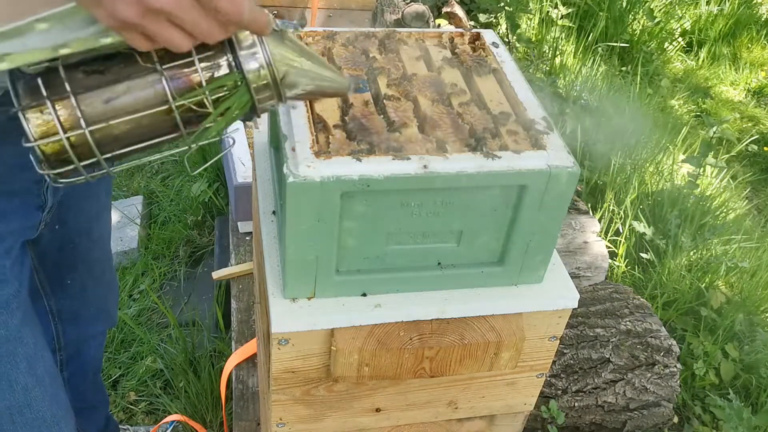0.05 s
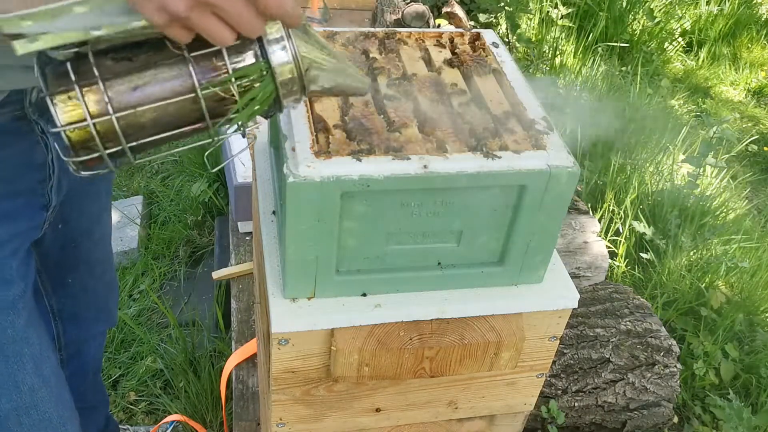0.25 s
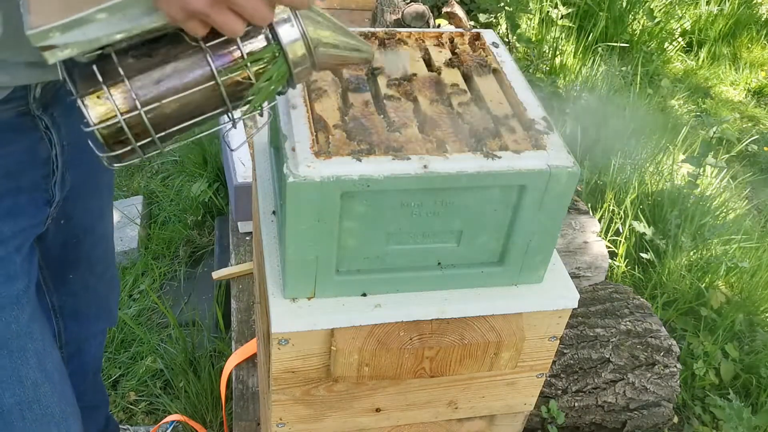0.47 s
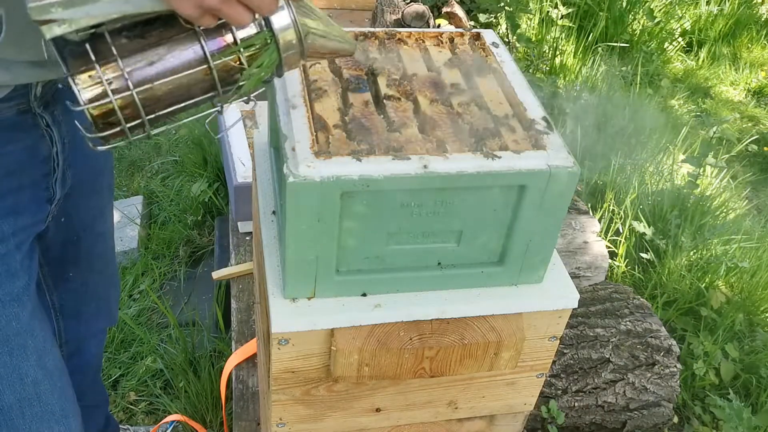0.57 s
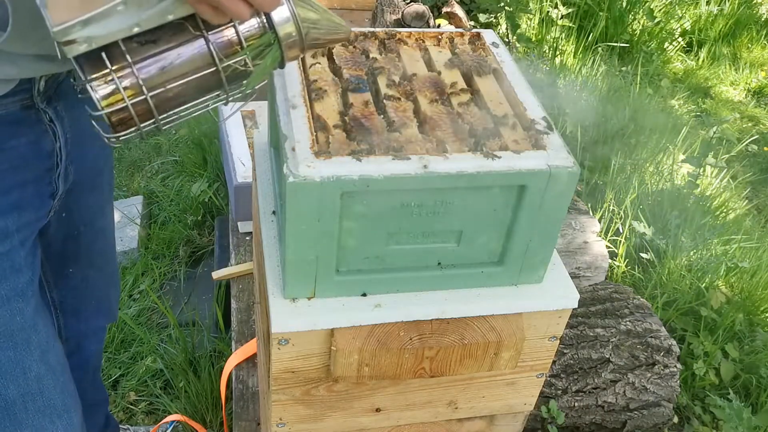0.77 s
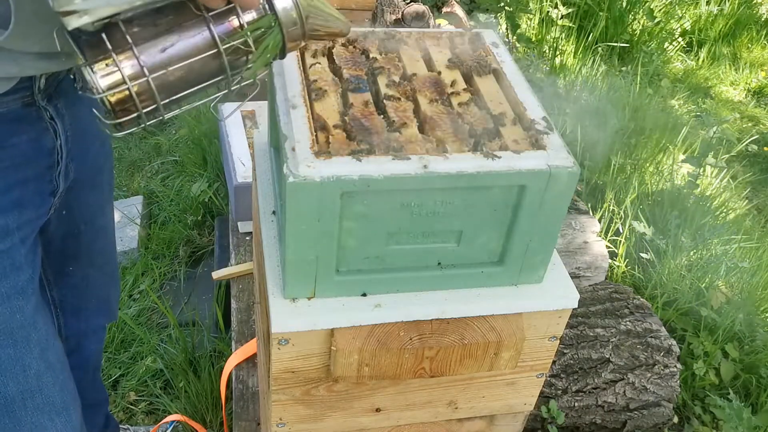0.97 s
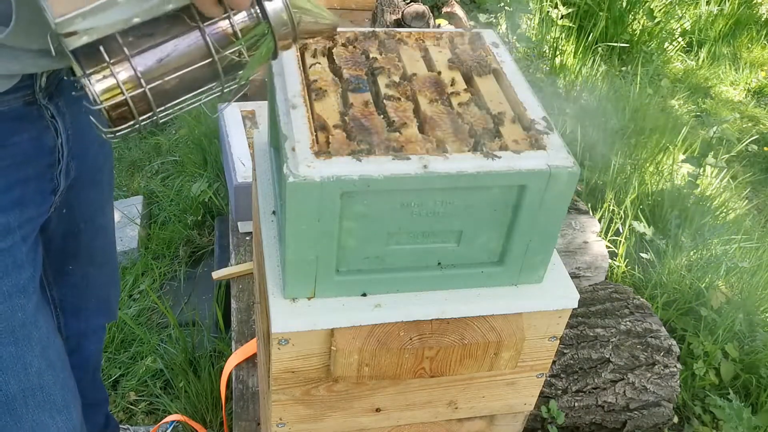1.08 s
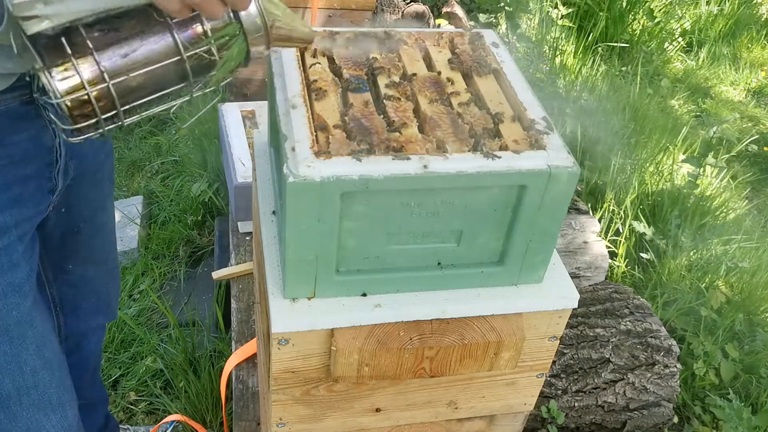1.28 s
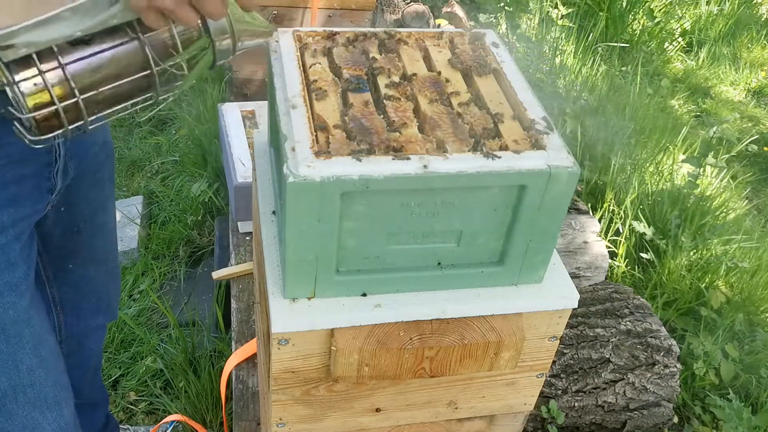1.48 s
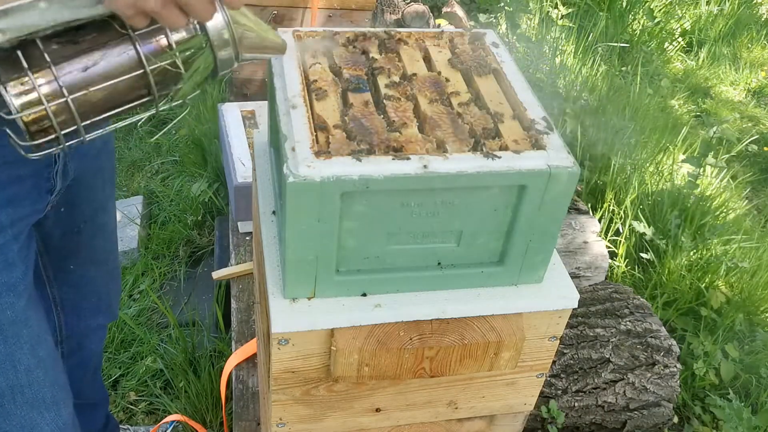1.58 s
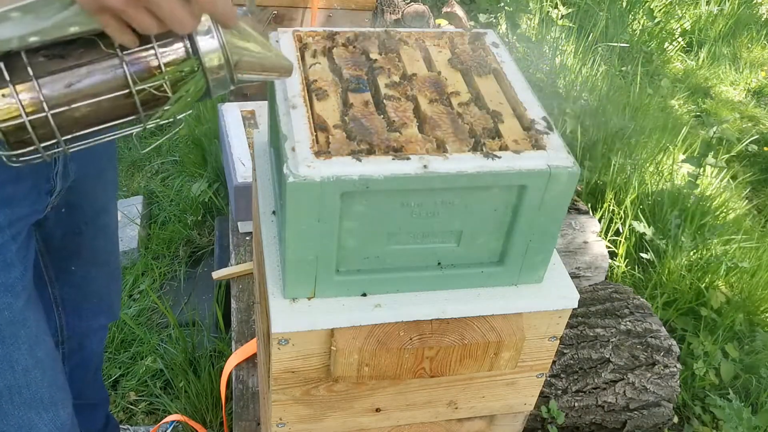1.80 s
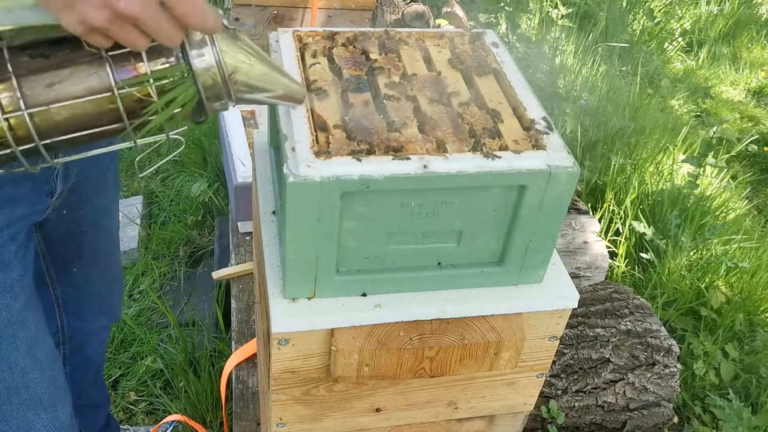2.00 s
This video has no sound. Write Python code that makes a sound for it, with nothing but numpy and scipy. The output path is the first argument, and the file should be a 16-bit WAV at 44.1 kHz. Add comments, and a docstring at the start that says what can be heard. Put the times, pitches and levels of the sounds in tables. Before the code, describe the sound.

A bee smoker is pumped five times, close on the left, at about 0.2, 0.6, 1.0, 1.4 and 1.7 seconds. Each squeeze gives a soft valve slap and a hollow, hissing puff like a blown bottle, the later ones weaker. Between squeezes the bellows suck air in with light knocks, ticks and tiny squeaks. A bird chirps faintly twice in the first half second over quiet garden air.

```python
"""A bee smoker is pumped five times beside an open hive, close by and to the left.
Each squeeze slaps the bellows valve shut and drives a puff through the hollow can, which sounds
like a blown bottle. The bellows then spring open, sucking air, with ticks and tiny squeaks.
A bird chirps twice over a quiet garden."""
import sys
import numpy as np
from scipy import signal
from scipy.fft import rfft, irfft
from scipy.io import wavfile

SR = 44100
rng = np.random.default_rng(int(sys.argv[2]) if len(sys.argv) > 2 else 0)


def unload_wav(signal):
    """Save mono or channel-first audio to the path in sys.argv[1] as 16-bit WAV at rate SR, clipped to [-1, 1]."""
    wavfile.write(
        sys.argv[1],
        SR,
        np.round(np.clip(np.atleast_2d(signal).T, -1, 1) * 32767).astype(np.int16),
    )


N = 90404

# Levels in all tables are relative: each function adds its own overall level. One row per squeeze: (valve shuts
# [s], slap [dB], lift of the slap's two middle tones [dB], metal clink [dB], bounce delay [s], bounce [dB], can
# drone [dB], rush [dB], hiss [dB], puff length [s])
PUMP_STROKES = [(0.2417, 1.5, 10.5, -5.5, .0073, -12, 0, -3, -1, 0.12),
                (0.6368, 1.5, 1.5, -12, 0.0052, -9, -1.5, -3, 0.5, 0.099),
                (1.0254, 1.5, -7.5, -5, 0.00486, -20, -2.5, -5.5, -3.5, 0.1),
                (1.3880, 0.5, -28, -1.5, 0.0052, -11, -3.5, -7.5, -7, 0.099),
                (1.7433, 0, 1, 0, 0.0047, -11, -4.5, -10, -7.5, 0.076)]
# Hiss of escaping air: (frequency [Hz], level [dB])
HISS_SPECTRUM = [(2500, -12), (4200, 10), (5200, 4), (6600, 6), (12000, 3), (13200, -10)]
# Rustle of the leather: (frequency [Hz], level [dB])
LEATHER_SPECTRUM = [(50, -7.5), (200, 7.5), (850, -5.5), (1500, -16), (4000, -47)]


def undb(db):
    """Turn decibels into a gain."""
    return 10 ** (np.asarray(db) / 20)


def unit(x):
    """Scale to an average (rms) strength of 1."""
    return x / np.sqrt(np.mean(x ** 2) + 1e-20)


def clock():
    """The time of every sample, in seconds."""
    return np.arange(N) / SR


def colour(x, points):
    """Filter by a curve of (frequency [Hz], level [dB]) points."""
    hz, db = np.array(points, float).T
    freqs = np.arange(N // 2 + 1) * SR / N
    gain = undb(np.interp(np.log(freqs + 1), np.log(hz), db))
    return irfft(rfft(x) * gain, N)


def cut(x, order, hz, keep):
    """Keep the "low" or the "high" side of a frequency."""
    return signal.sosfilt(signal.butter(order, hz, keep, fs=SR, output="sos"), x)


def noise(points):
    """Steady noise with the given spectrum."""
    return unit(colour(rng.standard_normal(N), points))


def burst(points, envelope):
    """A short rustle or knock with the given spectrum."""
    white = rng.standard_normal(N)
    return colour(white * envelope, points) / np.std(colour(white, points))


def sine(hz):
    """A tone of strength 1 that follows a moving pitch."""
    return np.sqrt(2) * np.sin(2 * np.pi * np.cumsum(hz) / SR)


def blown(hz, width_hz):
    """A resonance stirred by swirling air: its pitch wanders, its strength stays fairly even."""
    freqs = np.fft.fftfreq(N, 1 / SR)
    band = np.fft.ifft(np.fft.fft(rng.standard_normal(N)) / (1 + ((freqs - hz) / width_hz) ** 2))
    return unit(np.sqrt(np.abs(band)) * np.cos(np.angle(band)))


def swell(middle, width_s):
    """A bell-shaped rise and fall."""
    return np.exp(-.5 * ((clock() - middle) / width_s) ** 2)


def rise(start, rise_s):
    """A smooth build-up from nothing."""
    return 1 - np.exp(-np.maximum(clock() - start, 0) / rise_s)


def fade(start, fade_s):
    """A sudden start that dies away by 60 dB in the fade time."""
    age = clock() - start
    return (age >= 0) * np.exp(-np.log(1000) * np.maximum(age, 0) / fade_s)


def ring(start, modes, pitch=1):
    """The natural tones (modes) of a struck object, dying away."""
    age = np.maximum(clock() - start, 0)
    return sum(undb(db) * fade(start, fade_s) * np.sin(2 * np.pi * hz * pitch * age)
               for hz, db, fade_s in modes)


def echo(x, fade_s):
    """Scattered outdoor reflections, different on each side."""
    tail = rng.standard_normal((2, N)) * fade(0, fade_s)
    return signal.fftconvolve(x[None], tail / np.sqrt(np.sum(tail[0] ** 2)), axes=1)[:, :N]


def garden():
    """Soft outdoor air, a low hum that swells once, and a faint hiss on the left."""
    # Outdoor air: (frequency [Hz], level [dB])
    air_spectrum = [(25, -9), (160, -1), (300, -6), (900, -10), (2800, -22.5), (5500, -41), (15500, -35.5)]
    # Faint hiss: (frequency [Hz], level [dB])
    faint_spectrum = [(1500, -10), (4500, -1.5), (15500, -25.5)]
    split_hz, hum_hz = 990, 55.6
    bass = cut(noise(air_spectrum), 1, split_hz, "low")  # the same on both sides
    treble = cut([noise(air_spectrum), noise(air_spectrum)], 1, split_hz, "high")
    hum = (undb(-69) + undb(-52.5) * swell(1.41, width_s=0.069)) * sine(np.full(N, hum_hz))
    left_hiss = undb(-78) * noise(faint_spectrum) * np.array([[1], [0]])
    return undb(-59.5) * (bass + treble) + hum + left_hiss


def bird():
    """A bird on the left gives thin falling whistles that echo from the trees."""
    # Chirps: (middle [s], level [dB])
    chirps = [(0.149, -61), (0.407, -62.5)]
    middle_hz, octaves_per_s, right_db = 4400, -11, -15
    out = 0
    for t, db in chirps:
        hz = middle_hz * 2 ** np.clip(octaves_per_s * (clock() - t), -1, 1)
        out += undb(db) * swell(t, width_s=.012) * np.sin(2 * np.pi * np.cumsum(hz) / SR)
    return (out + undb(2) * echo(out, fade_s=0.6)) * undb([[0], [right_db]])


def metal_clicks():
    """The smoker's metal parts give small crisp clicks."""
    # Clicks: (time [s], level [dB])
    clicks = [(1.528, -58.5), (1.7377, -55.5)]
    # Sound of a click: (frequency [Hz], level [dB])
    click_spectrum = [(2500, -12), (5500, -4), (15500, -17)]
    return burst(click_spectrum, sum(undb(db) * fade(t, fade_s=0.021) for t, db in clicks))


def whistles_and_creak():
    """Air whistles softly over the edges of the nozzle and the intake; near the end a faint drawn-out squeal
    sinks in pitch."""
    # Whistles, and the last sinking squeal: (middle [s], pitch [Hz], glide [Hz/s], level [dB])
    whistles = [(.055, 8450, 3000, -66), (.296, 1200, 4500, -46), (.286, 5000, 0, -61),
                (.685, 2450, 2000, -55), (.683, 5950, 0, -62), (.683, 9100, 0, -61), (1.07, 9350, 0, -66),
                (1.578, 8050, 0, -66), (1.912, 8750, 0, -66), (1.975, 2180, -2500, -59)]
    out = 0
    for t, hz, glide, db in whistles:
        pitch = hz + glide * (clock() - t)
        spread_hz = 0.054 * hz
        waver = noise([(spread_hz, 0), (4 * spread_hz, -40)])  # makes the tone breathy
        out += undb(db) * swell(t, width_s=0.016) * waver * sine(pitch)
    return out


def air_intake():
    """The bellows suck air back in while the leather unfolds."""
    # Refills: (middle [s], half length [s], hiss [dB], rustle [dB])
    refills = [(0.051, 0.056, 5.5, -6), (.455, 0.05, 9.5, 17), (0.832, 0.056, 6.5, -1),
               (1.219, 0.042, 9, 2), (1.568, 0.051, 7, 13.5), (1.923, 0.048, 7, 5)]
    # Air rushing in: (frequency [Hz], level [dB])
    suck_spectrum = [(700, 14.5), (1600, 9.5), (2800, 5.5), (6000, -12.5), (8400, -2.5), (10800, -5),
                     (13000, -14)]
    suck = undb(-61) * noise(suck_spectrum)
    leather = undb(-68.5) * noise(LEATHER_SPECTRUM)
    return sum(swell(t, width_s) * (undb(hiss_db) * suck + undb(rustle_db) * leather)
               for t, width_s, hiss_db, rustle_db in refills)


def opening_knocks():
    """As the bellows open, the boards knock and rattle and the hinge ticks."""
    # Openings: (time [s], knock [dB], tick [dB])
    openings = [(0.0368, -0.5, -4.5), (0.4539, 6.5, -1), (0.835, 7.5, 10), (1.217, -10, -12),
                (1.5770, -3.5, -22), (1.9149, 4.5, 3)]
    # Ringing wood: (pitch [Hz], level [dB], fade time [s])
    wood_modes = [(524, -2, 0.079), (820, 5.5, 0.017)]
    # Ringing hinge: (pitch [Hz], level [dB], fade time [s])
    hinge_modes = [(1095, 4.5, 0.0065), (1930, -3, 0.0087), (3580, -1, 0.0047)]
    rattle_level = sum(undb(db - 53) * fade(t, fade_s=0.063) for t, db, _ in openings)
    out = burst(LEATHER_SPECTRUM, rattle_level)
    for t, knock_db, tick_db in openings:
        knock = undb(knock_db - 43.5) * ring(t, wood_modes)
        tick = undb(tick_db - 36.5) * ring(t, hinge_modes)
        out += rise(t, rise_s=0.00061) * (knock + tick)
    return out


def spring_squeaks():
    """The spring squeaks with two close, high tones and a rasp."""
    # Squeaks: (time [s], level [dB], pitch [ratio])
    squeaks = [(.4665, -5.5, 0.979), (.856, -4.5, 0.98), (1.235, -5, 0.98), (1.242, -5.5, 0.99),
               (1.575, -16.5, .81), (1.934, -19, 0.95)]
    # Ringing spring: (pitch [Hz], level [dB], fade time [s])
    spring_modes = [(4334, 2, 0.024), (4212, -1.5, 0.022)]
    rasp = undb(-12.5) * blown(hz=2780, width_hz=460)
    out = 0
    for t, db, pitch in squeaks:
        squeak = ring(t, spring_modes, pitch) + rasp * fade(t, fade_s=0.057)
        out += undb(db - 28.5) * rise(t, rise_s=0.0022) * squeak
    return out


def leather_folds():
    """Just before each slap the leather folds and a little air leaks out."""
    # Folds: (time [s], level [dB])
    folds = [(0.217, 2), (0.602, 0), (1.005, 2.5), (1.357, -1.5), (1.707, -5.5)]
    # Folding leather: (frequency [Hz], level [dB])
    fold_spectrum = [(50, -67), (130, 4.5), (230, 13), (400, -3), (700, 1.5), (3000, -41.5)]
    fold_s = 0.021
    fold_level = sum(undb(db - 38.5) * rise(t, rise_s=0.0027) * swell(t + fold_s, fold_s)
                     for t, db in folds)
    leak_level = undb(-72) * sum(swell(t + .018, width_s=.022) for t, _ in folds)
    return burst(fold_spectrum, fold_level) + leak_level * noise(HISS_SPECTRUM)


def can_tones():
    """Air sounds the can like a bottle; each tone swells, climbs and breaks off."""
    # Hollow tones: (loudest at [s], pitch then [Hz], level [dB])
    tones = [(.317, 236, -40.5), (.714, 213.3, -31.5), (1.117, 206.8, -40.5), (1.462, 208.7, -42.5)]
    # Slow wobble of the air stream: (frequency [Hz], level [dB])
    wobble = [(30, -3), (200, -66)]
    climb_hz_per_s, wander_hz, swell_s, stop_s = 550, 8.14, 0.019, 0.0073
    out = 0
    for t, hz, db in tones:
        pitch = hz + climb_hz_per_s * (clock() - t) + wander_hz * noise(wobble)
        width_s = np.where(clock() < t, swell_s, stop_s)
        level = undb(db + noise(wobble))  # flutters by about 1 dB
        out += level * swell(t, width_s) * sine(pitch)
    return out


def puffs():
    """Air drones in the hollow can, then rushes and hisses out of the nozzle."""
    # Resonances of the can and bellows: (pitch [Hz], width [Hz], level [dB])
    hollows = [(194, 29.3, 5.5), (303, 112, 0.5), (573, 9.1, -9)]
    # Air leaving the nozzle: (frequency [Hz], level [dB])
    rush_spectrum = [(100, -34), (300, 6.5), (480, -5), (633, -11), (1200, -4.5), (1550, -13.5),
                     (2700, -16.5), (5000, -45)]
    drone = undb(-38.5) * unit(sum(undb(db) * blown(hz, width) for hz, width, db in hollows))
    rush = undb(-33) * noise(rush_spectrum)
    hiss = undb(-56) * noise(HISS_SPECTRUM)
    out = 0
    for t, *_, drone_db, rush_db, hiss_db, length in PUMP_STROKES:
        air = undb(drone_db) * drone * swell(t + 0.37 * length, 0.47 * length)
        air += undb(rush_db) * rush * swell(t + 0.4 * length, 0.29 * length)
        out += rise(t, rise_s=0.012) * air  # the jet builds once the valve has shut
        out += undb(hiss_db) * hiss * swell(t + 0.49 * length, 0.24 * length)
    return out


def flap_hit(start, woody_db):
    """The soft valve flap hits the board; an off-centre hit brings out two of its middle tones."""
    # Ringing valve and boards: (pitch [Hz], level [dB], fade time [s])
    board_modes = [(210, -11, 0.011), (330, 6.5, 0.016), (510.5, -9.5, 0.027), (733, -11.5, 0.019),
                   (1023, -13.5, 0.02)]
    modes = [(hz, db + woody_db * is_woody, fade_s)
             for (hz, db, fade_s), is_woody in zip(board_modes, (0, 0, 1, 1, 0))]
    hit = -rise(start, rise_s=0.002) * ring(start, modes)
    return cut(hit, order=2, hz=130, keep="high")


def valve_slaps():
    """Each squeeze slaps the valve shut; it bounces once, and the jolt makes the can clink."""
    # Ringing metal can: (pitch [Hz], level [dB], fade time [s])
    metal_modes = [(2393, -0.5, 0.019), (2529, -12, 0.056), (3800, 0, 0.0027)]
    out = 0
    for t, slap_db, woody_db, clink_db, bounce_s, bounce_db, *_ in PUMP_STROKES:
        bounce = undb(bounce_db) * flap_hit(t + bounce_s, woody_db)
        out += undb(slap_db - 13.5) * (flap_hit(t, woody_db) + bounce)
        out += undb(clink_db - 34) * rise(t, rise_s=0.00072) * ring(t, metal_modes)
    return out


def scene():
    """The smoker in the garden; its sound reaches the right side later and duller than the left."""
    # Weakening on the right: (frequency [Hz], level [dB])
    shadow = [(200, -1.9), (1100, -5.5), (2400, -14.5), (7000, -32)]
    right_delay_s = 0.00031
    squeezing = puffs() + leather_folds() + valve_slaps() + can_tones()
    opening = air_intake() + opening_knocks() + spring_squeaks()
    smoker = squeezing + opening + whistles_and_creak() + metal_clicks()
    right = np.interp(clock() - right_delay_s, clock(), colour(smoker, shadow))
    return np.array([smoker, right]) + undb(-18) * echo(smoker, fade_s=.2) + bird() + garden()


def record(dry):
    """Cut away the very highest treble."""
    top_hz = 15750
    return signal.sosfilt(signal.ellip(10, .2, 70, top_hz, fs=SR, output="sos"), dry)


dry = scene()
out = record(dry)
unload_wav(out)
```